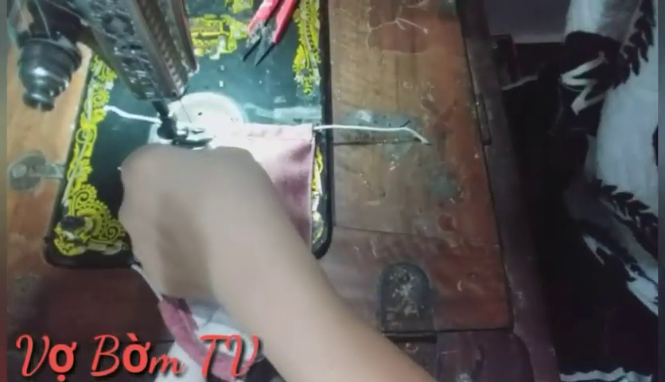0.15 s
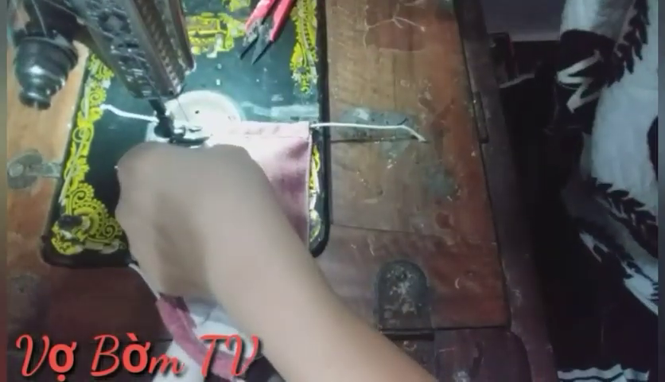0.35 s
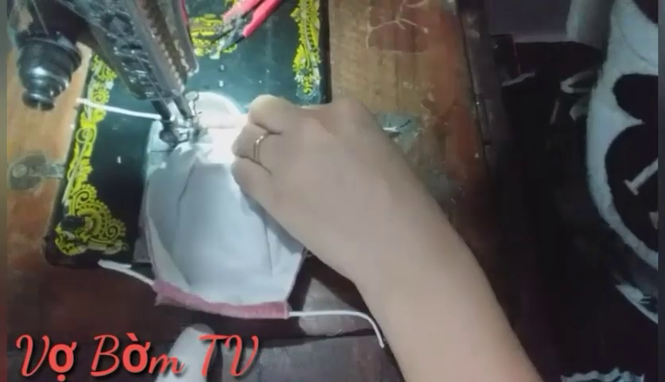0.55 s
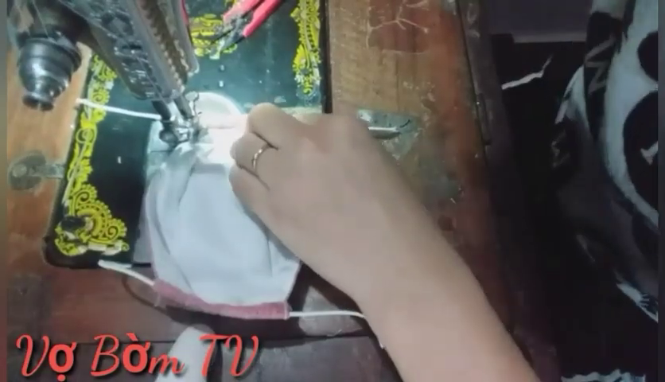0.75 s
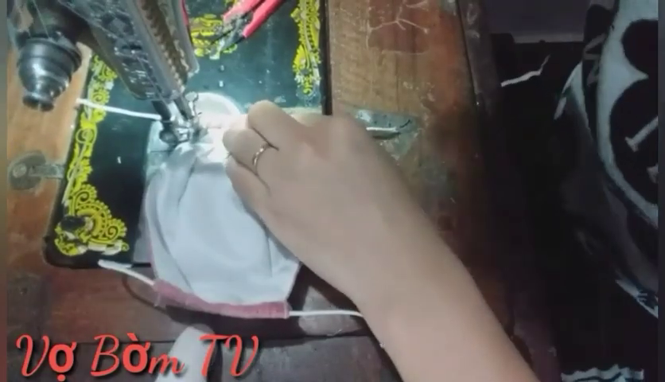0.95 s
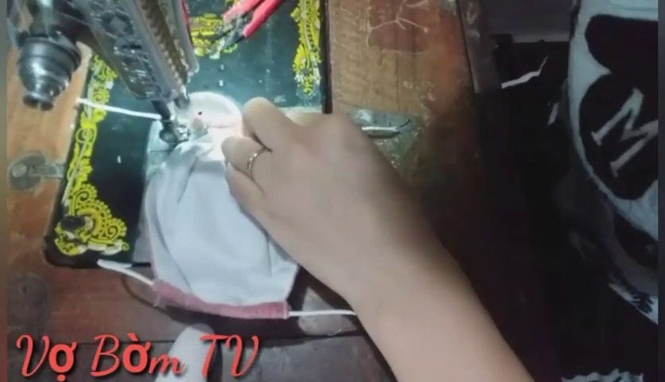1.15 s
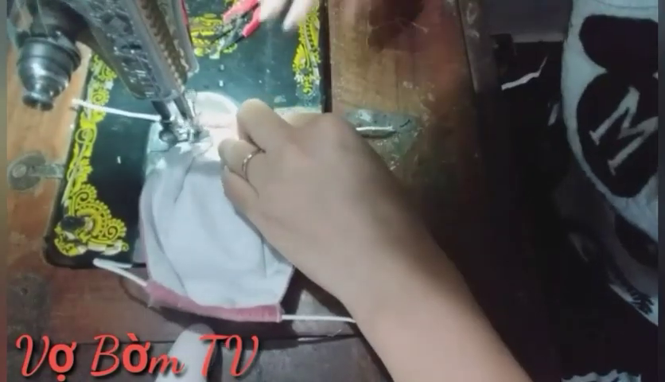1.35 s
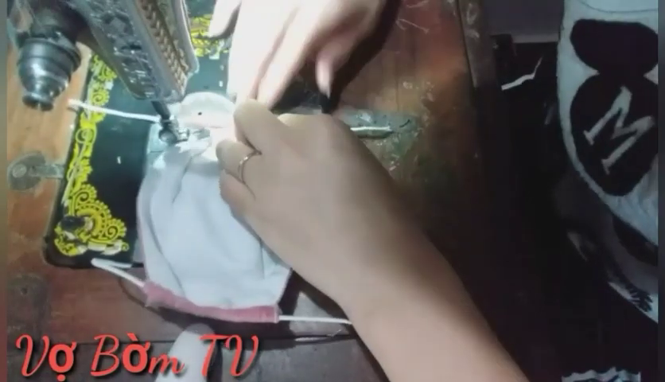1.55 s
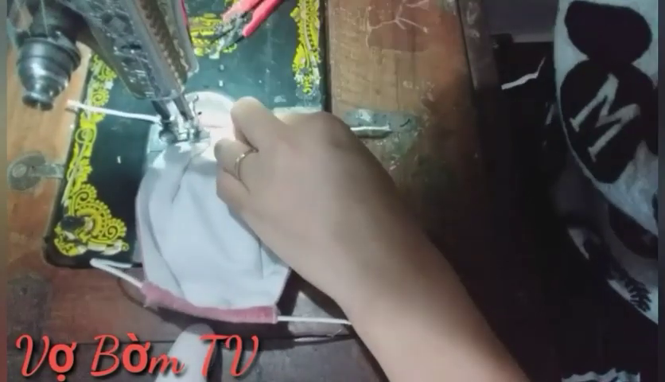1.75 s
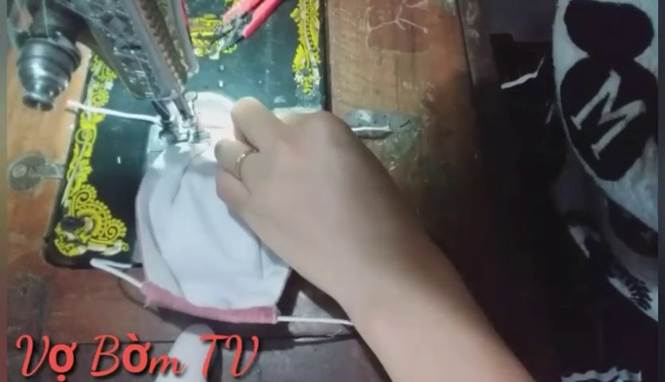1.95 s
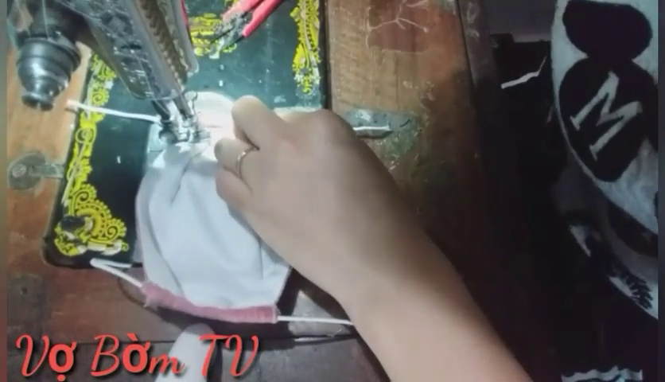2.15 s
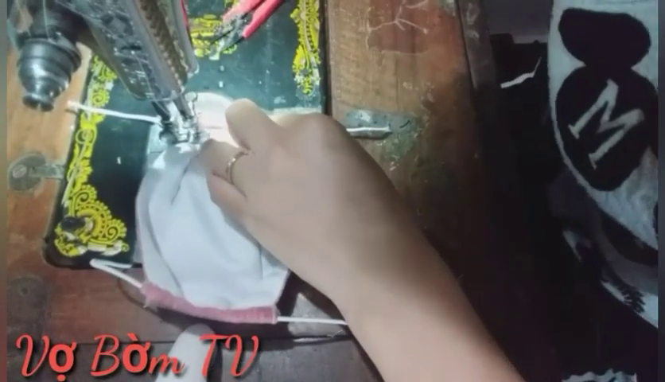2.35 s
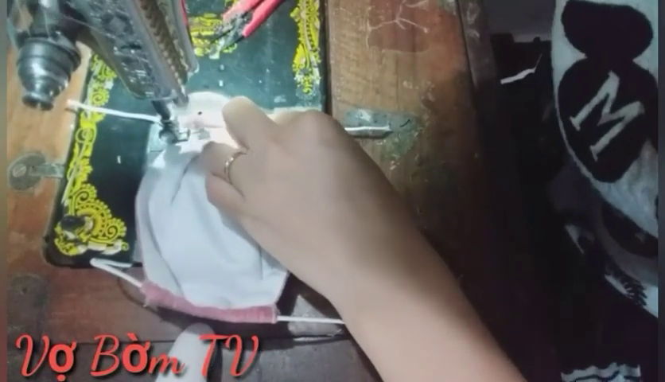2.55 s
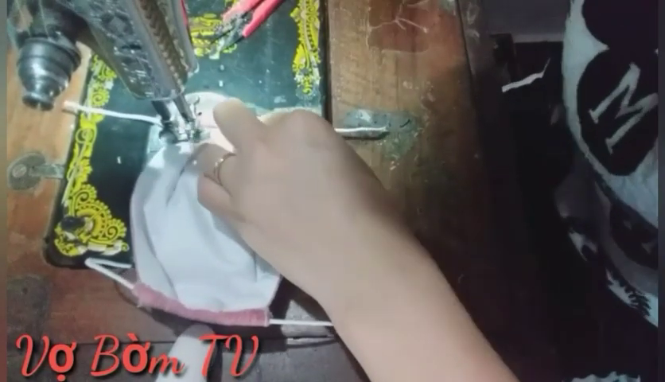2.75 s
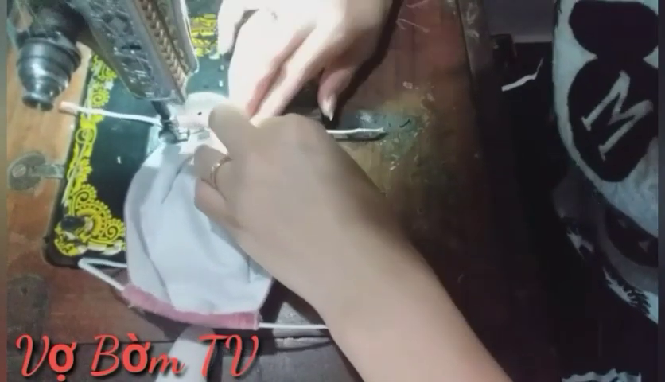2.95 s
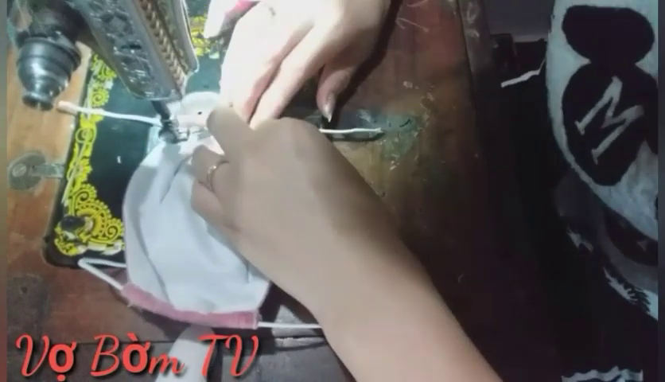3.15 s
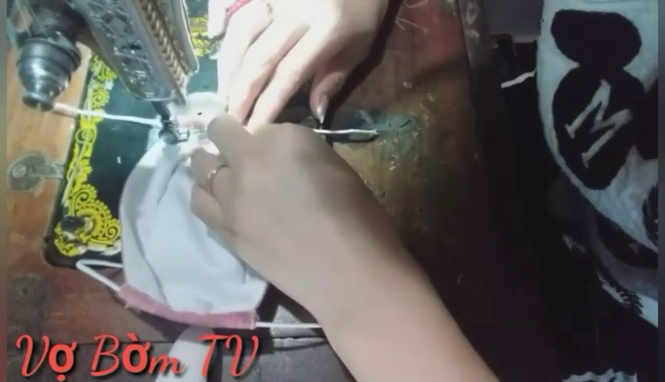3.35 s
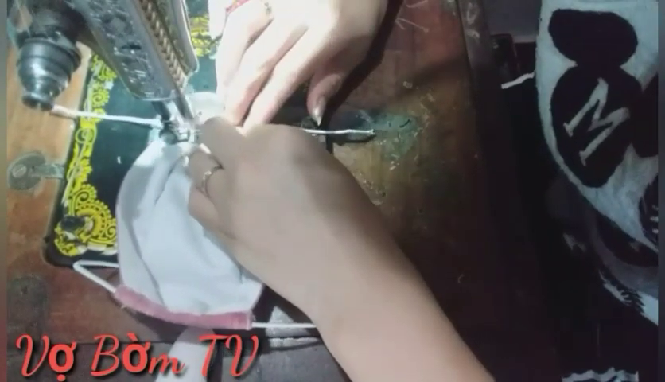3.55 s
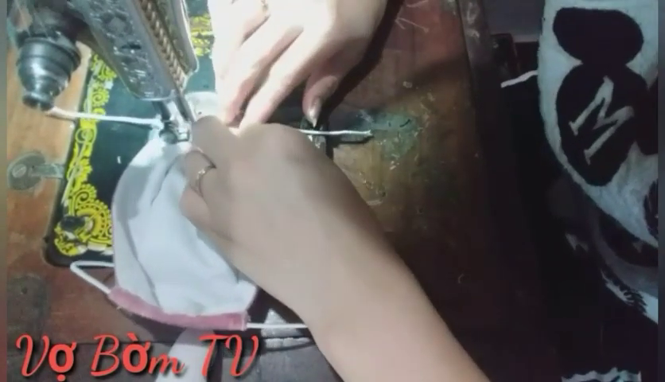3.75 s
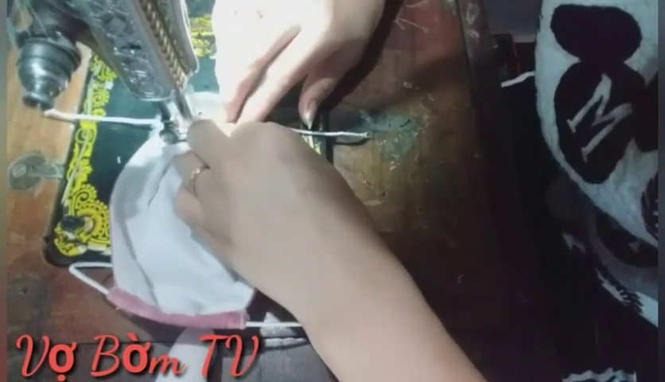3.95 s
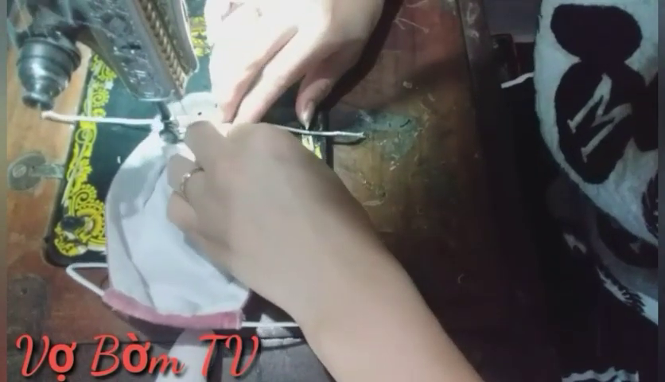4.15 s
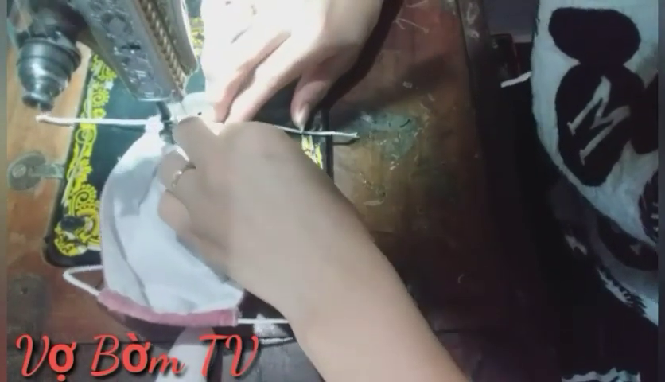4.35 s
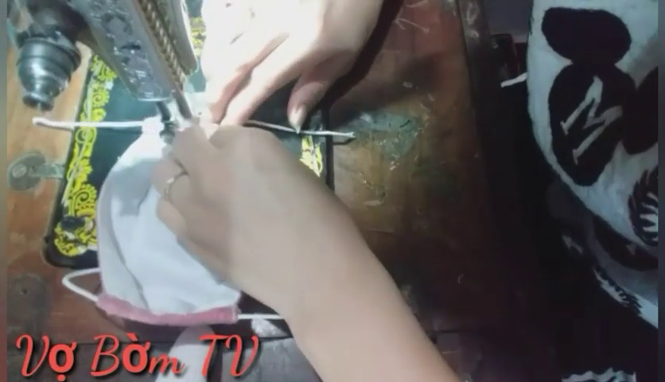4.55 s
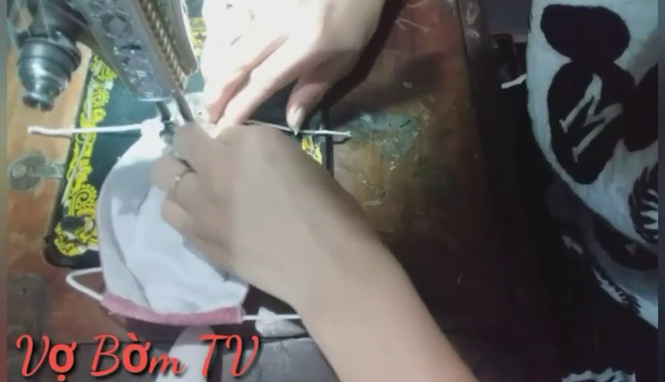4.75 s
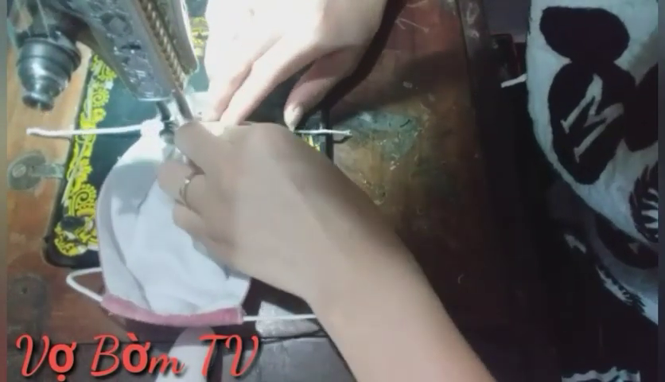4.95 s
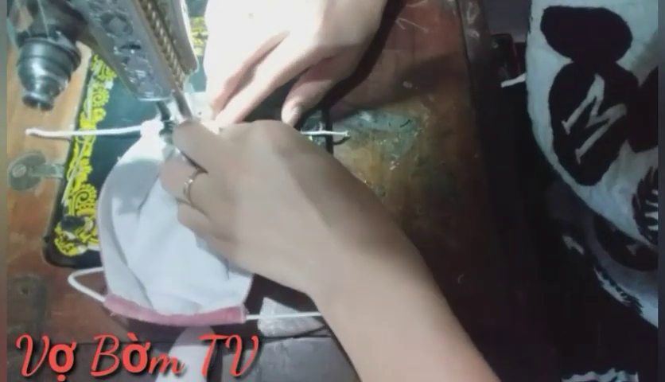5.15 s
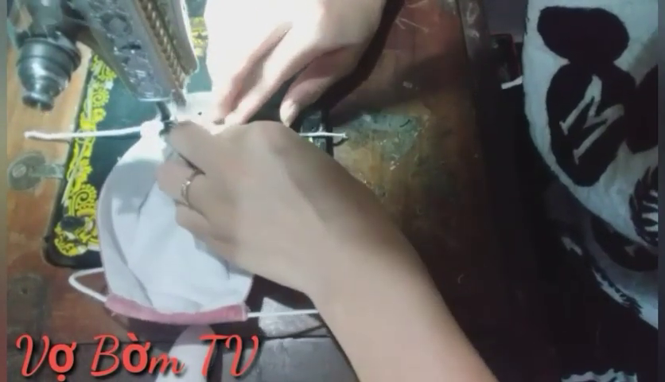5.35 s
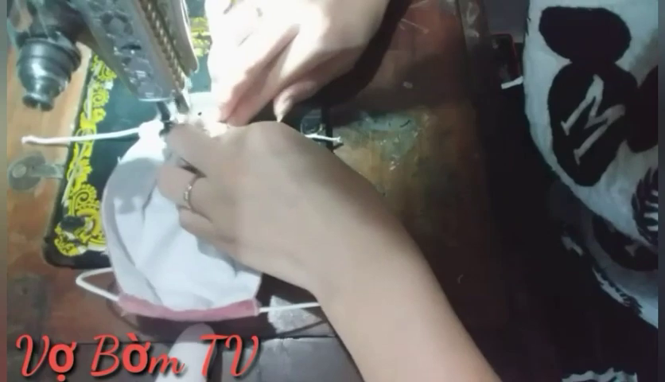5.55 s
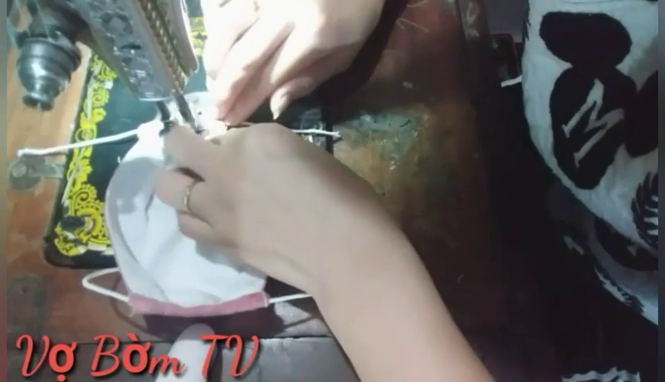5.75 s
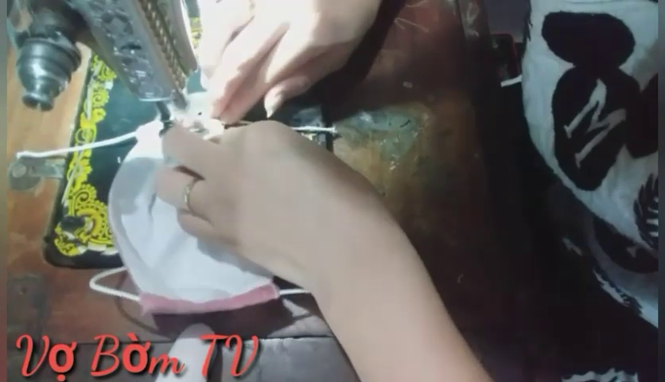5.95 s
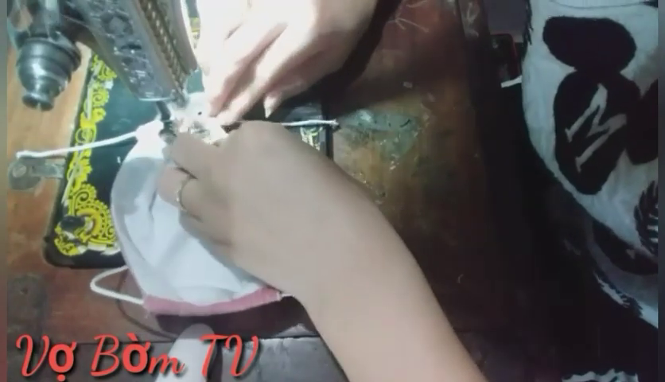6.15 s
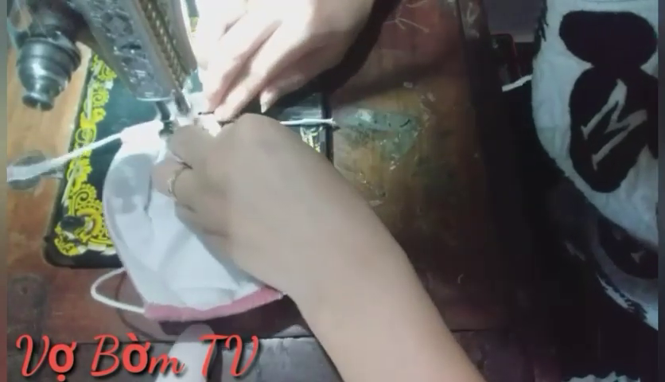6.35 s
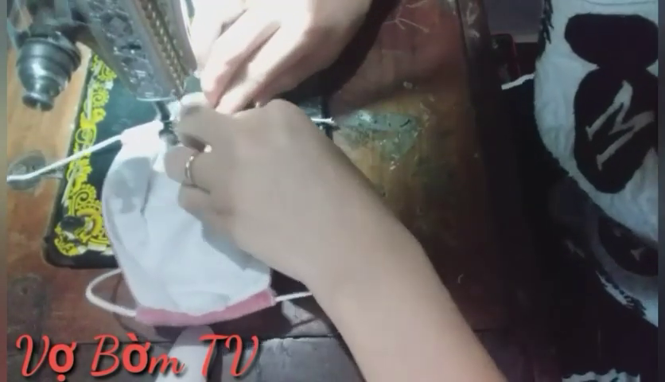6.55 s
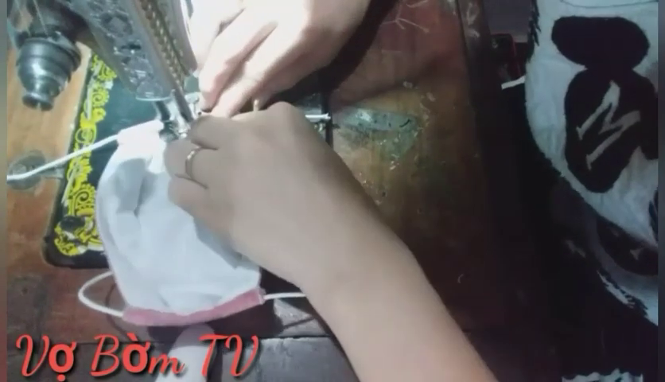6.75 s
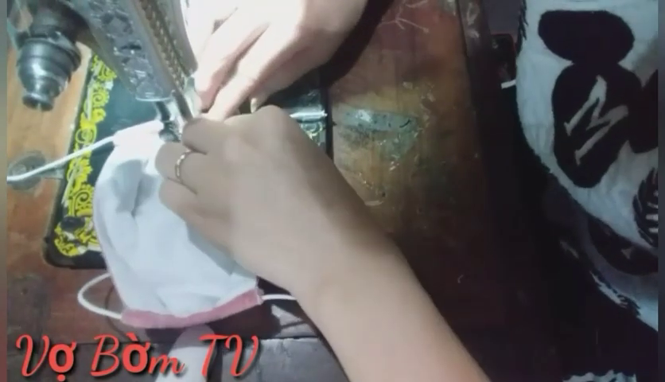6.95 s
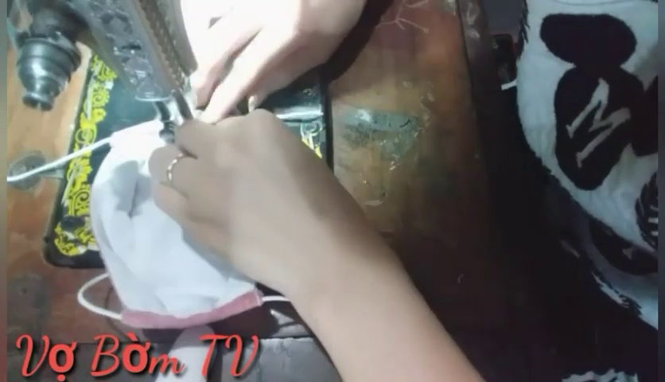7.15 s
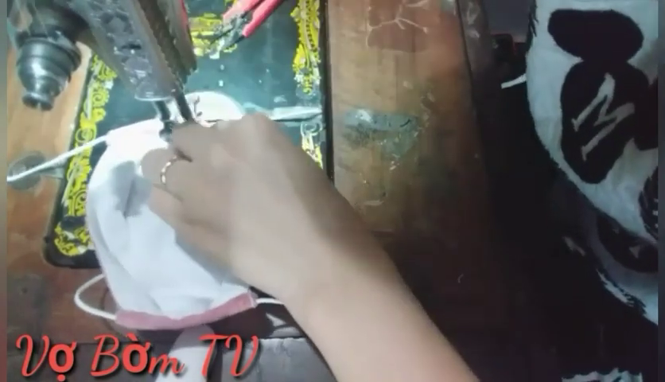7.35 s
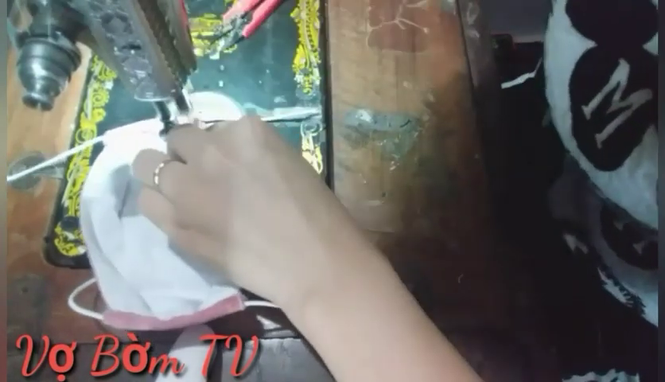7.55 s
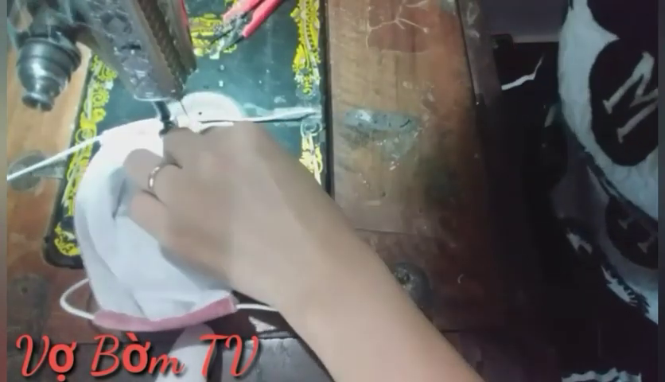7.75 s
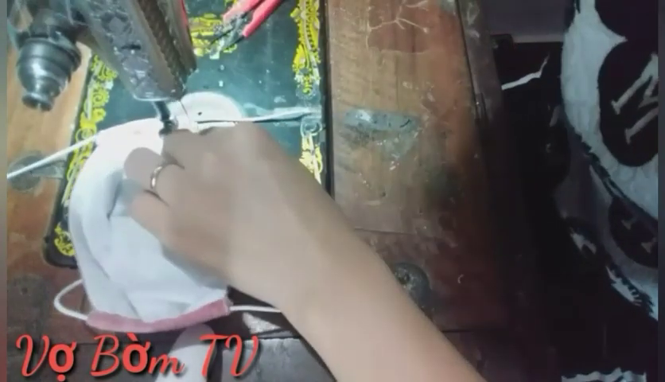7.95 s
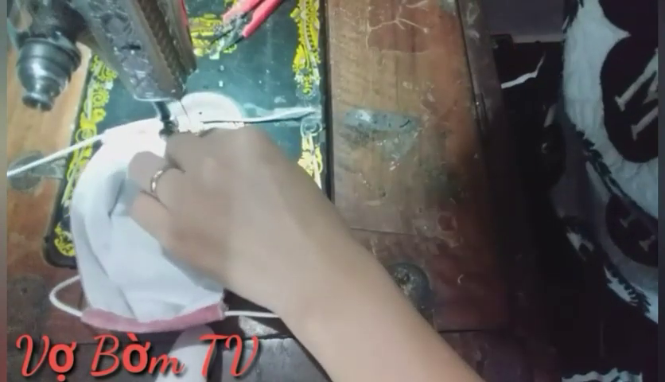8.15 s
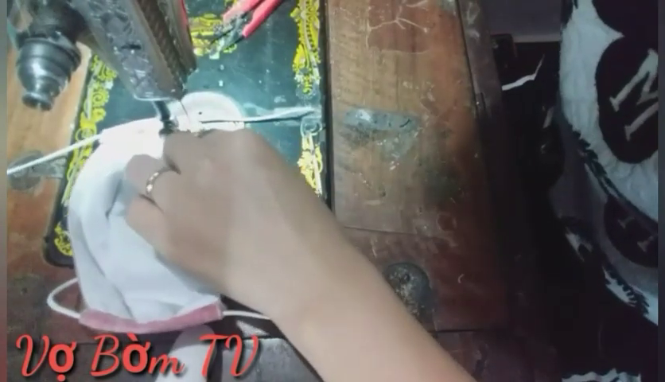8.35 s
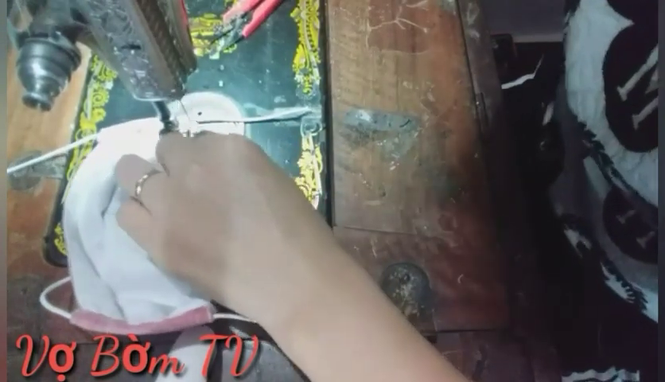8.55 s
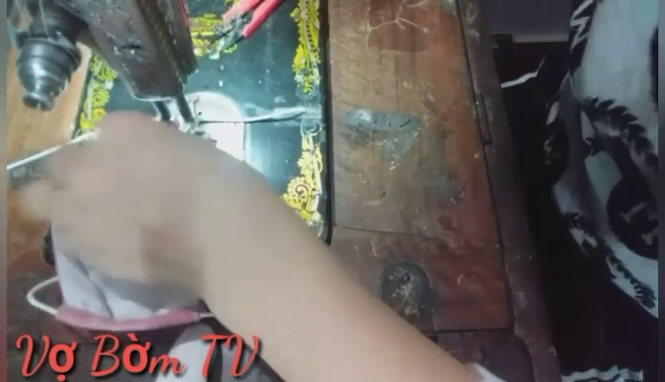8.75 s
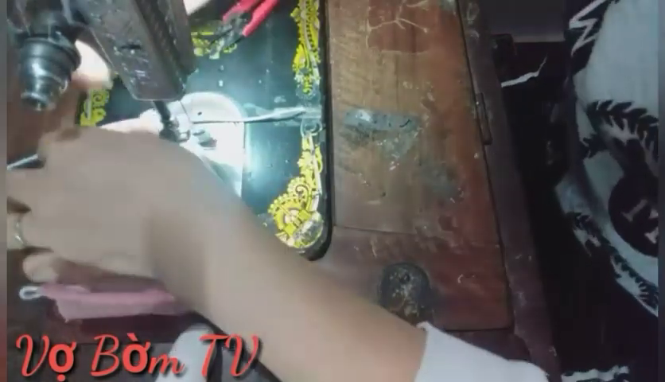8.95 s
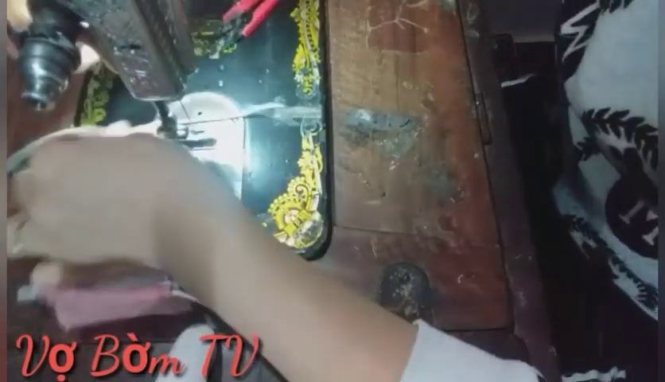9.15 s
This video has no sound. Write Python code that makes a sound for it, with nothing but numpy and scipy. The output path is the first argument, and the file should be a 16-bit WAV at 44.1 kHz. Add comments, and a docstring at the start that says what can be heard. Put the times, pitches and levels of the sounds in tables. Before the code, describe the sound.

A close, dry, nearly mono pickup of an old iron treadle sewing machine on a wooden table indoors. From 0 to 1 s it is quiet: soft cloth rustle, small dull bumps, low treadle hums near 1 s, over faint insect hiss and room rumble. At about 1.1 to 1.8 s the machine lurches through two stitches, hard metallic clacks with woody thuds. It stops; cloth shifts and a tiny high bearing squeak sounds near 2.3 s. From 2.5 s a long run begins slowly, quickening by 3.2 s to about six stitches a second, each a cluster of bright knocks, rattles and low booms, over gritty friction and ticking. It slows to around three a second between 5.5 and 6.8 s, speeds up again from 7 s, eases slightly and ends near 8.8 s. Light bumps, short hums and crisp cloth rustle finish just after 9 s.

```python
"""An old cast-iron treadle sewing machine stitches cloth on a wooden table, heard from close by.
Cloth rustles and bumps open it; treadle hums lead into a short run of stitches from about 1.1 s.
A dry bearing squeaks near 2.3 s, then a long run lasts from 2.5 to 8.8 s and gives way to rustle and bumps.
Noise bursts and friction noise ring resonant modes of iron and table; sines make booms, hums and squeak.
Shaped noise makes the cloth and, throughout, a faint insect hiss and low room rumble."""
import sys
import numpy as np
from scipy import signal
from scipy.fft import rfft, irfft
from scipy.io import wavfile
from scipy.ndimage import uniform_filter1d

SR = 44100
rng = np.random.default_rng(int(sys.argv[2]) if len(sys.argv) > 2 else 0)


def materialize(psi):
    """Save the field psi as 16-bit PCM at rate SR to the path in sys.argv[1].

    A 1-D psi becomes a single channel; in a 2-D psi each row is a channel.
    """
    bounded = np.clip(np.atleast_2d(psi).T, -1, 1)
    quanta = np.round(bounded * 32767).astype(np.int16)
    wavfile.write(sys.argv[1], SR, quanta)


N = 406161

# modes of the iron head, the wide ones its dense, damped ringing; levels are relative:
# (frequency [Hz], width [Hz], level when struck [dB], extra level when shaken gently [dB])
IRON_MODES = [(1301, 30, 1.5, 11.5), (1803, 130, -4.5, 4), (2155, 274, -0.5, 6.5), (2560, 380, 6.5, -4),
              (3080, 88, -8, -21), (3365, 110, 7, 0.5), (3539, 62, 11, 4.5), (3730, 100, -2.5, 12),
              (4310, 280, 2.5, -2), (4700, 210, -3, -22), (4940, 440, -6, -9), (6100, 200, -17.5, -1),
              (7346, 280, -2, -7.5), (12960, 220, -22, 0.5), (1570, 940, -42.5, -1.5),
              (3110, 760, -3.5, 10.5), (4660, 1570, -8, 2.5), (6870, 610, -32.5, 0.5),
              (10670, 4300, -29.5, 30), (14500, 7800, -56, -22)]
# modes of the wooden table, levels relative:
# (frequency [Hz], width [Hz], level [dB], extra level under steady running [dB])
TABLE_MODES = [(162.6, 20, 0.5, 11.5), (254, 60, -2.5, 8), (313, 69, -9, -11), (372, 45, -6.5, 3),
               (481.3, 48, -2.5, -4), (658, 27.7, -2, 2.5), (791, 18, -8.5, -3), (1166, 780, -19.5, 4.5)]


def knocks():
    """Each knock is a blow and a ragged dying rattle that ring iron and table with a colour of their own."""
    s, db, hz, t60, thud_db = blows()
    t = np.arange(6000) / SR
    rattle, shiver, push = np.zeros((3, N))
    for k in range(len(s)):
        grit = rng.standard_normal((4, len(t)))
        # loose parts bounce against each other
        chatter_db = 23.0 * uniform_filter1d(grit[2], size=50) * (1 - np.exp(-t / 0.01))
        # short knocks are hard ones: a quicker rise and more crack
        crack = 0.026 / t60[k] * gain_of(-60 * t / 0.0029)
        rise = 1 - np.exp(-t / (0.023 * t60[k]))
        decay = gain_of(-60 * t / t60[k]) + crack
        add(rattle, s[k], gain_of(db[k] + 2.5 + chatter_db) * grit[0] * decay * rise)

        # dull knocks land on wood and shake the iron less
        dull_db = 18.0 * min(np.log2(hz[k] / 2800), 0)
        shiver_db = db[k] - 9.5 + dull_db + chatter_db - 60 * t / 0.11
        add(shiver, s[k], gain_of(shiver_db) * grit[3] * rise)

        # the heavy table takes up and loses the blow at its own pace
        table_swell = gain_of(-60 * t / 0.14) * (1 - np.exp(-t / 0.0024))
        add(push, s[k], gain_of(db[k] + thud_db[k] + 4.0) * grit[1] * table_swell)

    # for every sample, the latest knock sets the colour
    latest = np.maximum(np.searchsorted(s * SR, np.arange(N), "right") - 1, 0)
    iron_hz, _, _, gentle_db = np.transpose(IRON_MODES)
    luck = rng.standard_normal((len(s), len(IRON_MODES) + len(TABLE_MODES)))
    # where the blow lands tilts the ringing up or down, and favours some modes by chance
    tilt = np.log2(hz[:, None] / 3400) * np.clip(np.log2(iron_hz / 3000), -.7, 1.5)
    iron_shares = gain_of(6.83 * luck[:, :len(IRON_MODES)] + 46.0 * tilt)
    table_shares = gain_of(3.0 * luck[:, len(IRON_MODES):])

    iron = ring(lambda w: rattle * w[latest], IRON_MODES, iron_shares)
    table = ring(lambda w: push * w[latest], TABLE_MODES, table_shares)
    shaken = ring(lambda w: shiver * w, IRON_MODES, gain_of(gentle_db)[None])
    return iron + table + shaken


# each stitch the needle bar takes up its play, then lands, and the bed plate booms:
# (time [s], take-up level [dB], landing delay [ms], landing level [dB], landing rattle t60 [s], boom level [dB])
NEEDLE_STITCHES = [(1.22, -33.5, 8.5, -31, 0.024, -25), (1.5557, -17, 8.7, -13, 0.017, -35),
                   (2.6268, -39, 25.3, -14, 0.028, -20), (2.9195, -37, 37, -15.5, 0.017, -21.5),
                   (3.1689, -19, 6.4, -12.5, 0.031, -34), (3.3508, -16, 5.86, -16, 0.044, -21),
                   (3.5233, -19, 7, -15.5, .022, -21), (3.7164, -20.5, 14.4, -26.5, .057, -24),
                   (3.8897, -19.5, 6.3, -24, 0.067, -24), (4.0487, -19.5, 6.1, -19, 0.041, -15),
                   (4.2033, -23, 5.45, -11.5, .018, -19), (4.369, -16, 4.9, -16, 0.056, -14.5),
                   (4.5338, -23, 5.6, -26.5, 0.14, -19), (4.704, -25, 2.8, -15.5, 0.047, -23),
                   (4.8766, -23, 6.7, -14, 0.035, -24), (5.0647, -19.5, 5.85, -13, 0.0066, -17.5),
                   (5.2298, -15, 8.9, -20, 0.046, -21), (5.408, -16, 5.5, -25, 0.15, -19),
                   (5.653, -23, 8, -16, 0.036, -38), (5.9189, -19, 4.8, -22, 0.055, -41),
                   (6.2784, -28.5, 5.2, -23, 0.029, -19), (6.5933, -24.5, 9.5, -19.5, 0.026, -31),
                   (6.895, -22.5, 5.34, -15, 0.021, -21.5), (7.0964, -20, 2.85, -21.5, 0.11, -14),
                   (7.29, -32, 6.9, -11.5, 0.029, -17), (7.4503, -18, 6.4, -10, .032, -16),
                   (7.625, -23.5, 8.7, -29.5, 0.14, -16.5), (7.794, -16, 7.2, -21, .03, -34),
                   (7.9716, -19.5, 7.9, -15, 0.03, -40), (8.158, -20.5, 8.3, -14.5, 0.026, -27),
                   (8.362, -21.5, 6.7, -16, 0.027, -41), (8.5913, -18.5, 7.7, -30, .035, -44)]
# a third of a turn later the shuttle is caught: (time [s], level [dB], rattle t60 [s])
SHUTTLE_CATCHES = [(1.3746, -26.5, .049), (1.6614, -26.5, .014), (2.7417, -20.5, .027),
                   (3.0234, -21.5, .081), (3.241, -24.5, .015), (3.415, -22.5, .053), (3.5889, -21, .05),
                   (3.777, -21, .062), (3.949, -18, .028), (4.0978, -17, .024), (4.2724, -27, .14),
                   (4.4254, -19, .064), (4.5978, -19.5, .02), (4.7628, -20.5, .05), (4.9393, -19.5, .037),
                   (5.1258, -16.5, .026), (5.2967, -20.5, .032), (5.4849, -26.5, .11), (5.7495, -28, .13),
                   (6.0164, -23.5, .036), (6.3978, -23.5, .039), (6.7219, -24.5, .045), (6.9684, -20, .039),
                   (7.1663, -16.5, .036), (7.3561, -18, .013), (7.5127, -16, .029), (7.6774, -18, .037),
                   (7.8561, -29.5, .1), (8.0402, -23.5, .018), (8.2378, -32, .093), (8.4331, -20.5, .034),
                   (8.7103, -27.5, .007)]
# half a turn later it is thrown back: (time [s], level [dB], rattle t60 [s])
SHUTTLE_THROWS = [(1.4311, -18.5, 0.032), (1.7733, -20.5, 0.03), (2.8027, -30.5, 0.11), (3.059, -13, 0.018),
                  (3.2745, -17, 0.018), (3.448, -25.5, 0.043), (3.6219, -19.5, 0.013),
                  (3.7964, -15.5, .033), (3.9898, -24, 0.039), (4.1317, -18, 0.029), (4.2902, -15.5, 0.023),
                  (4.445, -18, 0.027), (4.619, -13.5, 0.034), (4.7872, -12.5, 0.044),
                  (4.9811, -15.5, 0.019), (5.144, -14, 0.025), (5.317, -10.5, .016), (5.5182, -16.5, 0.046),
                  (5.8014, -26.5, 0.035), (6.0804, -23, 0.0086), (6.4433, -15.5, .024),
                  (6.7738, -16.5, .03), (7.0046, -12.5, 0.033), (7.1978, -11, 0.019), (7.3796, -13, 0.037),
                  (7.5365, -12.5, 0.025), (7.711, -16.5, 0.029), (7.8953, -16.5, 0.017), (8.077, -15, 0.02),
                  (8.2647, -15, 0.048), (8.4595, -17.5, 0.031), (8.771, -20, 0.045)]
# further knocks in between, some leading just into a throw: (time [s], level [dB], rattle t60 [s])
LOOSE_KNOCKS = [(1.0886, -28.5, 0.039), (1.4279, -26, 0.03), (1.5282, -35, .043), (1.5717, -23.5, 0.033),
                (1.6246, -34, .046), (1.7408, -42.5, .029), (2.4946, -32, 0.036), (2.6917, -24.5, 0.034),
                (2.7936, -25, .026), (3.015, -23, 0.015), (3.2369, -26, 0.038), (3.2643, -29.5, 0.044),
                (3.282, -26, .018), (3.2933, -26, .015), (3.4654, -32, .027), (3.611, -29, 0.042),
                (3.8256, -23.5, 0.027), (3.9747, -36, 0.053), (4.0768, -26, .04), (4.154, -24.5, .023),
                (4.4711, -22.5, 0.029), (4.8129, -27, .045), (5.001, -26.5, 0.051), (5.6707, -26.5, 0.039),
                (5.7825, -30.5, 0.21), (5.9456, -24, .026), (6.215, -34, 0.11), (6.289, -26, 0.072),
                (6.3264, -31, .034), (6.3559, -31.5, 0.042), (6.438, -33, .075), (6.5764, -32, 0.051),
                (6.6832, -31.5, 0.017), (6.7637, -39.5, 0.094), (6.8866, -23, 0.15), (6.995, -23, .026),
                (7.1263, -27.5, 0.12), (7.4785, -36, 0.053), (7.8817, -37, .09), (8.2522, -33, .019),
                (8.2903, -40, 0.043), (8.7035, -52, 0.037)]
# duller bumps on machine and table, mostly while it stands or starts:
# (time [s], level [dB], brightness [Hz], rattle t60 [s], relative thud into the table [dB])
DULL_BUMPS = [(0.0654, -43.5, 2000, 0.077, -6.5), (0.0707, -58, 1800, 0.052, -18),
              (0.4386, -64.5, 4080, 0.041, 6), (0.468, -61, 4880, 0.043, -13),
              (0.7916, -70.5, 2560, 0.039, 12.5), (0.953, -59, 1880, 0.036, 11.5),
              (0.9716, -53.5, 3000, 0.017, 6.5), (1.101, -42, 2590, 0.18, -19),
              (1.2685, -23.5, 2910, 0.13, -2.5), (2.375, -60.5, 1890, 0.037, 3.5),
              (2.4728, -40, 2410, 0.028, -3), (2.5793, -46, 2550, 0.014, 4.5), (5.715, -49, 2600, 0.03, 9),
              (8.559, -52, 2510, 0.35, -14), (8.716, -63, 2580, 0.03, -4), (8.9504, -42, 2150, 0.014, -2.5),
              (9.0448, -40, 2850, 0.023, -6.5), (9.159, -39.5, 3460, 0.016, -12.5),
              (9.179, -39, 3860, 0.068, -23)]
# each part at the usual strength and fast pace: (brightness [Hz], relative thud into the table [dB])
TAKE_UP_SOUND, LANDING_SOUND = (3330, -9.5), (3270, -10)
CATCH_SOUND, THROW_SOUND, LOOSE_SOUND = (3460, -11.5), (3430, -14), (4180, -10.5)
USUAL_DB, TAKE_UP_T60_S = -20, 0.042
BRIGHTEN_OCTAVES_PER_DB, THUD_DB_PER_DB = 0.0233, -0.38  # harder knocks: brighter, less woody
PACE_BRIGHTEN_OCTAVES = 0.059  # per octave of stitching speed: slow knocks are duller


def blows():
    """All knocks in time order: strength bends a part's colour and thud, pace its colour; bumps stay as listed."""
    s, up_db, delay_ms, down_db, down_t60, _ = np.transpose(NEEDLE_STITCHES)
    landed = s + delay_ms / 1e3
    take_ups = np.c_[s, up_db, np.full_like(s, TAKE_UP_T60_S)]
    landings = np.c_[landed, down_db, down_t60]
    parts = [(take_ups, TAKE_UP_SOUND), (landings, LANDING_SOUND), (SHUTTLE_CATCHES, CATCH_SOUND),
             (SHUTTLE_THROWS, THROW_SOUND), (LOOSE_KNOCKS, LOOSE_SOUND)]
    rows = list(DULL_BUMPS)
    for events, (hz, thud_db) in parts:
        for at, db, t60 in events:
            harder, faster = db - USUAL_DB, speed(at)
            octaves = BRIGHTEN_OCTAVES_PER_DB * harder + PACE_BRIGHTEN_OCTAVES * faster
            rows.append((at, db, hz * 2 ** octaves, t60, thud_db + THUD_DB_PER_DB * harder))
    return np.transpose(sorted(rows))


BOOM_HZ, BOOM_DELAY_S = 246.3, 0.0032  # typical pitch, wait after the landing


def booms():
    """One clean low mode that swells and dies after the needle bar lands, slightly detuned each time."""
    out, t = np.zeros(N), np.arange(5000) / SR
    chance = rng.standard_normal((len(NEEDLE_STITCHES), 2))
    for (s, _, delay_ms, _, _, db), (detune, turn) in zip(NEEDLE_STITCHES, chance):
        landed = s + delay_ms / 1e3
        swing = np.sin(2 * np.pi * (BOOM_HZ * (1 + 0.032 * detune) * t + turn))
        swell = 1 - np.exp(-t / 0.0064)
        add(out, landed + BOOM_DELAY_S, gain_of(db - 60 * t / 0.15) * swell * swing)
    return out


def running():
    """Gritty friction of shafts and belt through the same iron and wood."""
    rub_db, rumble_db = pace()
    grit = rng.standard_normal((3, N))
    lumps_db = 90.0 * uniform_filter1d(grit[2], size=900)  # the drag comes and goes
    rub = grit[0] * gain_of(rub_db + lumps_db)
    rumble = grit[1] * gain_of(rumble_db + lumps_db)
    gentle = gain_of(np.transpose(IRON_MODES)[3])[None]
    steady = gain_of(np.transpose(TABLE_MODES)[3])[None]
    return ring(lambda w: rub * w, IRON_MODES, gentle) + ring(lambda w: rumble * w, TABLE_MODES, steady)


# the wheel turns: (start [s], stop [s], extra rumble [dB])
WHEEL_RUNS = [(1.124, 1.72, 3.5), (2.501, 8.787, -0.1)]
# sliding parts, then the table under them: at the fast pace, with speed, outside a run
RUB_DB, RUB_DB_PER_OCTAVE, RUB_FADE_DB_PER_S = -42.5, 9.5, 74
RUMBLE_DB, RUMBLE_DB_PER_OCTAVE, RUMBLE_FADE_DB_PER_S = -40.5, 4, 100.5
START_STEEPNESS = 4  # a run starts this many times quicker than it dies


def pace():
    """Rub and rumble levels in dB: they follow the stitching speed and die away outside the runs."""
    octaves = speed(np.arange(N) / SR)
    idle = [outside(start, stop, START_STEEPNESS) for start, stop, _ in WHEEL_RUNS]
    rub_db = -RUB_FADE_DB_PER_S * np.min(idle, axis=0)
    rumble_runs = [run[2] - RUMBLE_FADE_DB_PER_S * seconds for run, seconds in zip(WHEEL_RUNS, idle)]
    rumble_db = np.max(rumble_runs, axis=0)
    return (RUB_DB + RUB_DB_PER_OCTAVE * octaves + rub_db,
            RUMBLE_DB + RUMBLE_DB_PER_OCTAVE * octaves + rumble_db)


FAST_PER_S, SLOW_PER_S = 6, 2.6  # stitches a second: the reference pace, and the slowest counted


def speed(t):
    """Stitching speed in octaves above the fast pace, from the gaps between stitches."""
    s = np.append(np.transpose(NEEDLE_STITCHES)[0], N / SR)
    middles = (s[1:] + s[:-1]) / 2
    per_s = np.maximum(1 / np.diff(s), SLOW_PER_S)
    return np.log2(np.interp(t, middles, per_s) / FAST_PER_S)


def ticks():
    """Small bright ticks of loose parts at random moments ring the iron; their level follows the rub."""
    chance, size_db, grit = rng.random(N), 2.9 * rng.exponential(1, N), rng.standard_normal(N)
    starts = (chance < 35.0 / SR) * gain_of(pace()[0] + size_db + 6.5)  # about 35 a second
    decay = gain_of(-60 * np.arange(800) / SR / 0.008)
    bursts = grit * signal.oaconvolve(starts, decay)[:N]
    bright = gain_of(54.0 * np.log2(np.transpose(IRON_MODES)[0] / 3000))[None]
    return ring(lambda w: bursts * w, IRON_MODES, bright)


# the treadle strains and the table hums: (time [s], level [dB], pitch [Hz], length [s])
TREADLE_HUMS = [(0.83, -38.5, 270, 0.039), (.87, -44, 157, 0.019), (.975, -38, 172, 0.058),
                (1.004, -27, 244, 0.097), (1.08, -36, 162, 0.06), (1.275, -25, 165, 0.097),
                (1.79, -41.5, 160, 0.073), (2.49, -38, 154.4, .11), (5.53, -32.5, 164, 0.078),
                (5.71, -30, 161, 0.064), (5.95, -32.5, 164.4, 0.072), (6.22, -30, 250, .04),
                (8.995, -33, 165.5, 0.062), (9.023, -35.5, 242, 0.033)]
# a dry bearing squeaks, pitch and relative level along its glide: (time [s], pitch [Hz], level [dB])
BEARING_SQUEAK = [(2.258, 3450, -53), (2.274, 3360, -42), (2.29, 3330, -61), (2.305, 3250, -55),
                  (2.35, 3340, -66)]
# its harmonics: (multiple of the pitch [1], level [dB])
SQUEAK_HARMONICS = [(1, -2.5), (2, -6), (3, -11)]


def treadle():
    """Sines that swell and fade as low hums, and one wavering squeak with overtones."""
    out = np.zeros(N)
    for s, db, hz, length in TREADLE_HUMS:
        t = np.arange(0, length, 1 / SR)
        add(out, s, gain_of(db) * np.sin(2 * np.pi * hz * t) * np.sin(np.pi * t / length))

    s, hz, db = np.transpose(BEARING_SQUEAK)
    t = np.arange(s[0], s[-1], 1 / SR)
    turns = np.cumsum(np.interp(t, s, hz)) / SR
    grip_db = 52.0 * uniform_filter1d(rng.standard_normal(len(t)), size=150)  # the grip slips unevenly
    tone = sum(gain_of(level) * np.sin(2 * np.pi * k * turns) for k, level in SQUEAK_HARMONICS)
    level = gain_of(np.interp(t, s, db) + grip_db - 1.0)
    add(out, s[0], level * tone * signal.windows.tukey(len(t), .15))
    return out


# fingers shift the cloth: (start [s], level [dB], length [s])
CLOTH_MOVES = [(0, -60, 0.079), (0.176, -51.5, 0.029), (.35, -70, 0.47), (0.837, -55, .04),
               (2.198, -54.5, .05), (2.27, -53.5, 0.077), (8.945, -42.5, 0.01), (9.08, -60, .06),
               (9.188, -39.5, .03)]
# colour of the fabric hiss: (frequency [Hz], relative level per Hz [dB])
CLOTH_SPECTRUM = [(200, 3), (1500, -15), (3500, -12), (7500, -9), (9000, -9), (15000, 1)]
RUSTLE_FADE_DB_PER_S = 185


def rustle():
    """Soft uneven hiss of fabric, fading in and out around each move."""
    moves = [db - RUSTLE_FADE_DB_PER_S * outside(s, s + length) for s, db, length in CLOTH_MOVES]
    level_db = np.max(moves, axis=0)
    lumps_db = 60.0 * uniform_filter1d(rng.standard_normal(N), size=600)
    return gain_of(level_db + lumps_db) * coloured(CLOTH_SPECTRUM, channels=1)[0]


# how long the room rings: (frequency [Hz], t60 [s])
ROOM_DECAY = [(150, 0.55), (700, 0.14), (3500, 0.18), (8000, 0.18), (15000, 0.2)]


def room(x):
    """A noise tail whose bands die at their own speed."""
    hz, t, z = signal.stft(rng.standard_normal(SR // 2), SR, nperseg=256)
    decay = gain_of(-60 * t / read(ROOM_DECAY, hz)[:, None])
    tail = signal.istft(z * decay, SR, nperseg=256)[1]
    tail[:300] = 0  # a short gap before the room answers
    return signal.fftconvolve(x, tail / np.linalg.norm(tail))[:N]


# rumble and insects: (frequency [Hz], relative level per Hz [dB])
QUIET_SPECTRUM = [(18, -53), (30, -1), (112, 7.5), (179, -6.5), (252, -10.5), (449, -26), (584, -19),
                  (1040, -24.5), (4530, -27), (5590, -9.5), (7270, -23), (16000, -35)]
QUIET_DB = -62.5


def background():
    """Low room rumble and insect hiss: steady coloured noise whose level wavers."""
    swell_db = 170.0 * uniform_filter1d(rng.standard_normal(N), size=3000)
    return gain_of(QUIET_DB + swell_db) * coloured(QUIET_SPECTRUM, channels=1)[0]


def gain_of(db):
    """Decibels to gain."""
    return 10 ** (np.asarray(db) / 20)


def read(points, hz):
    """Reads a spectrum on a log-frequency axis."""
    f, value = np.transpose(points)
    return np.interp(np.log(hz + 1), np.log(f + 1), value)


def add(mix, s, sound):
    """Mixes a sound in at s seconds."""
    part = mix[round(s * SR):][:len(sound)]
    part += sound[:len(part)]


def ring(drive, modes, shares):
    """Each mode resonates its own share of the drive; white noise of rms 1 comes out near rms 1."""
    hz, width, db = np.transpose(modes)[:3]
    r = np.exp(-np.pi * np.abs(width) / SR)  # wider modes die sooner
    weight = shares * gain_of(db)
    weight = weight / np.sqrt((weight ** 2 * (1 - r)).sum(axis=1, keepdims=True))
    poles = r * np.exp(2j * np.pi * hz / SR)
    return sum(2 * signal.lfilter([1 - abs(p)], [1, -p], drive(weight[:, k])).real
               for k, p in enumerate(poles))


def coloured(points, channels):
    """Noise of rms 1 with a given spectrum."""
    z = rfft(rng.standard_normal((channels, N))) * gain_of(read(points, np.fft.rfftfreq(N, 1 / SR)))
    x = irfft(z, N)
    return x / x.std()


def outside(start, stop, steepness=1):
    """Seconds before or after a span, for every sample; those before count steepness times."""
    t = np.arange(N) / SR
    return np.maximum(np.maximum(steepness * (start - t), t - stop), 0)


# difference between left and right: (frequency [Hz], side level relative to the shared sound [dB])
STEREO_WIDTH = [(100, -75.5), (3500, -72), (5000, -32), (15000, -16.5)]


def scene():
    """Machine, room and background in two channels that differ slightly in the treble."""
    machine = knocks() + booms() + running() + ticks() + treadle() + rustle()
    shared = machine + gain_of(-13) * room(machine) + background()
    # a scattered copy, opposite in left and right, lets the two channels differ slightly, mainly in the treble
    scatter = rng.standard_normal(900) * gain_of(-60 * np.arange(900) / 900)
    side = signal.oaconvolve(shared, scatter / np.linalg.norm(scatter))[:N]
    side = irfft(rfft(side) * gain_of(read(STEREO_WIDTH, np.fft.rfftfreq(N, 1 / SR))), N)
    return np.array([shared + side, shared - side])


# microphone response: (frequency [Hz], level [dB])
MICROPHONE_RESPONSE = [(30, -12.5), (100, -10), (160, -2.5), (7800, -2.5), (9200, -13), (16000, -12)]
EDGE_HZ = 15400  # band limit


def record(dry):
    """The microphone's thin bass and treble step, a soft overload on the hardest knocks, then the band limit."""
    response = gain_of(read(MICROPHONE_RESPONSE, np.fft.rfftfreq(N, 1 / SR)))
    heard = irfft(rfft(dry) * response, N)
    rounded = 1.1 * np.tanh(heard / 1.1)
    lowpass = signal.firwin(127, EDGE_HZ, window=("kaiser", 11), fs=SR)
    return signal.oaconvolve(rounded, lowpass[None], "same")


dry = scene()
out = record(dry)
materialize(out)
```